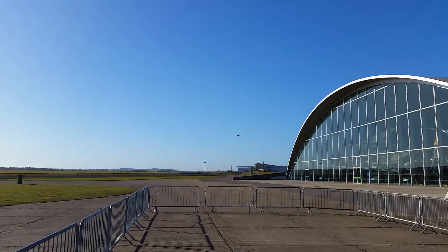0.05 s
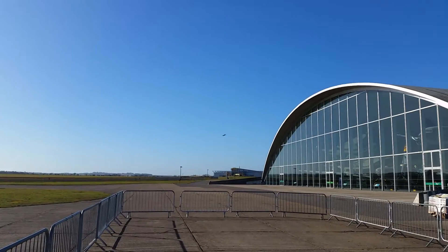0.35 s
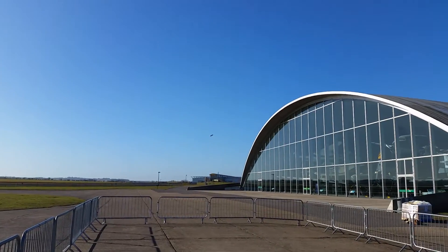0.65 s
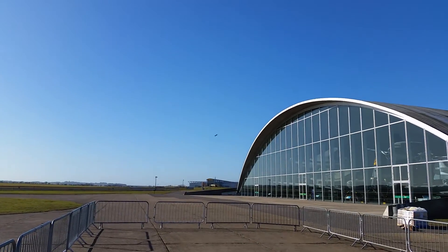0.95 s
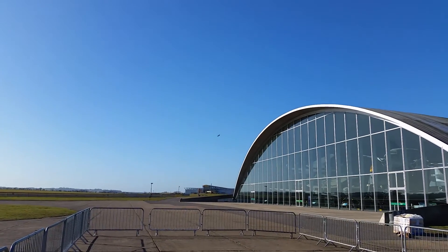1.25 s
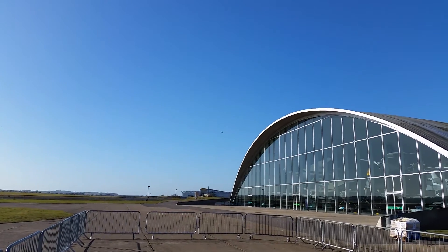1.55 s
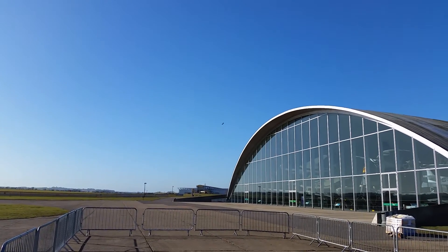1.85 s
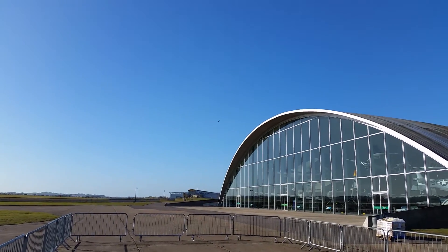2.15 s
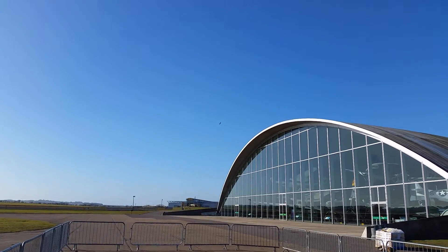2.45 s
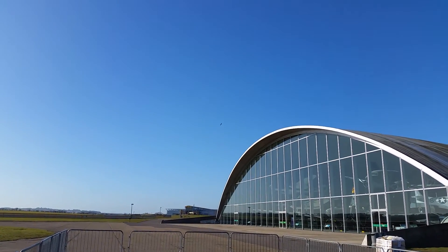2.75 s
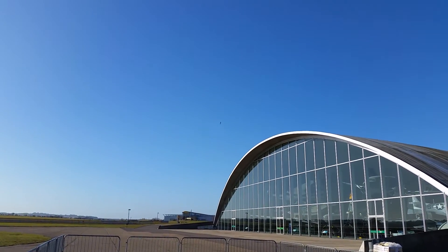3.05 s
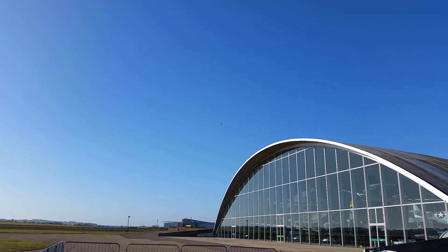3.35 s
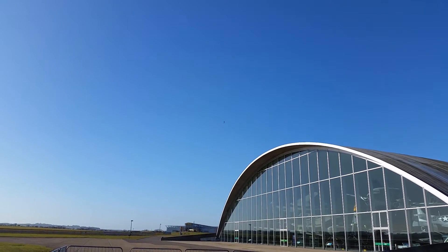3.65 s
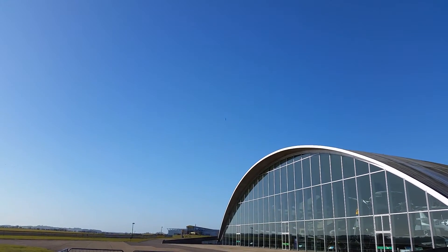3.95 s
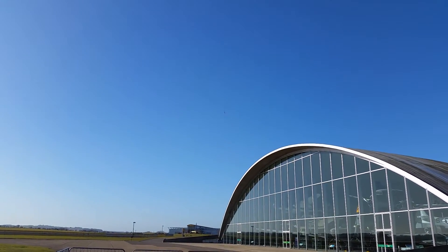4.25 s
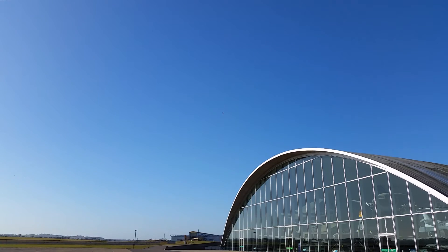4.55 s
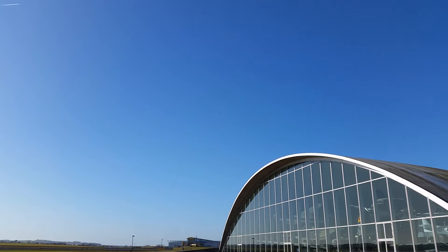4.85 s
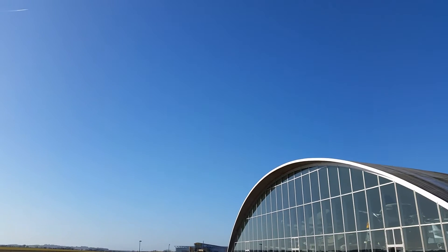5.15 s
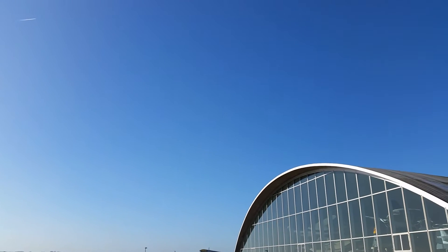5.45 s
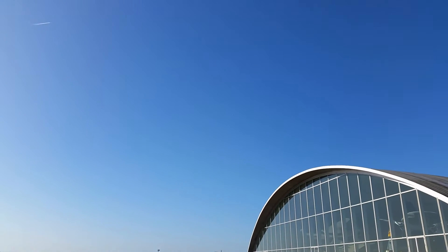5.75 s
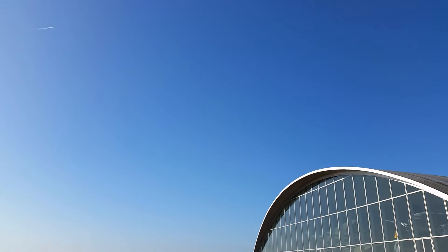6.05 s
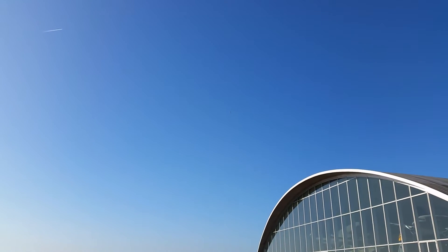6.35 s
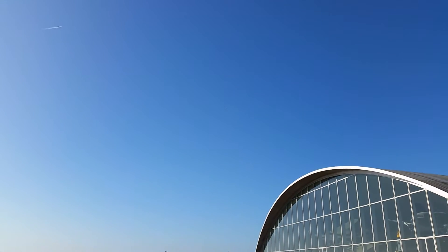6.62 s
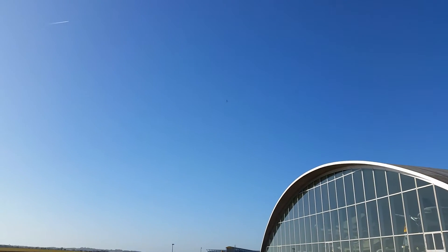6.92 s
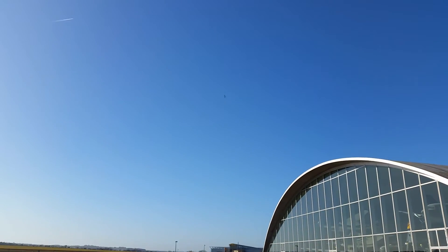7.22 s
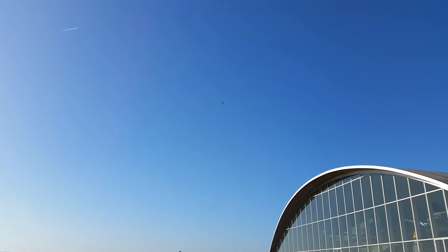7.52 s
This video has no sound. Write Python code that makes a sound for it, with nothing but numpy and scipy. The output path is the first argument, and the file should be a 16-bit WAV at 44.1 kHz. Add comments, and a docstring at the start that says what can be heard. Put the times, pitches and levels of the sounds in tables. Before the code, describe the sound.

Wind buffets the microphone as a far-off piston aircraft hums and rasps, sinks away, then returns.

```python
"""A distant propeller aircraft drones over an open airfield. It opens on the hum of its piston engine and
the rasp of its exhaust firings, swelling and fading in the moving air, over a steady ground engine and a
far rumble. A thin, wavering hiss swells after two seconds. From three seconds gusts thump the left
microphone port, while the right stays sheltered. Around five to six seconds the aircraft sinks away
under the wind; its rasp and upper hum come back just before the end."""
import sys
import numpy as np
from scipy import signal
from scipy.fft import rfft, irfft
from scipy.io import wavfile
from scipy.ndimage import uniform_filter1d, minimum_filter1d

SR = 44100
rng = np.random.default_rng(int(sys.argv[2]) if len(sys.argv) > 2 else 0)


def generate_wav(sig):
    """Save sig (samples, or channels by samples) to the path in sys.argv[1] as 16-bit PCM at SR."""
    pcm = np.round(np.clip(np.atleast_2d(sig).T, -1, 1) * 32767).astype(np.int16)
    wavfile.write(sys.argv[1], SR, pcm)


N = 338688
TIME = np.arange(N) / SR
BINS = np.maximum(np.arange(N // 2 + 1) * SR / N, 1)   # Hz
CYLINDERS = 6
AIR_EDGE_HZ = 2270   # where the top of the rasp begins, the part the moving air lifts and lowers

# The aircraft's pitch, sagging as it passes. Each row: time in seconds, four-stroke cycles per second.
ENGINE_SPEED = [(0.0, 17.55), (1.4, 17.22), (3.0, 17.2), (4.2, 17.05), (6.3, 17.22), (7.68, 17.42)]
def engine_cycles():
    """Running count of engine cycles; every cylinder fires once in each."""
    return np.cumsum(in_time(ENGINE_SPEED)[0]) / SR


# Fader for the firing tone. Each row: time in seconds, level in dB.
FIRING_LEVEL = [(0.0, -17.5), (0.2, -13.5), (0.52, -20.5), (0.74, -15), (1.2, -17.5), (1.5, -21),
                (2.95, -17.5), (3.3, -20.5), (4.25, -20), (4.7, -27), (5.0, -42.5), (7.68, -26)]
# Faders for the hum above it. Each row: time in seconds, ninth order in dB, upper orders in dB.
OVERTONE_LEVELS = [(0.0, -20.5, -19), (1.2, -24, -25), (2.3, -29, -31.5), (2.95, -21.5, -23),
                   (3.6, -32, -29), (4.2, -46, -22), (5.6, -38, -26), (7.68, -53, -17)]
# The mix of those upper orders. Each row: multiple of the cycle rate, relative level in dB.
UPPER_ORDERS = [(8, -9.5), (11, -7), (12, -1.5), (14, -9), (15, 0.5), (16, -11.5), (18, -14.5), (30, -19.5)]
def drone(cycles):
    """Clean engine orders: the firing tone, and the overtones that unequal cylinders fill in."""
    ninth_db, upper_db = in_time(OVERTONE_LEVELS)
    firing = from_db(in_time(FIRING_LEVEL)[0] + 0.5) * tone(CYLINDERS * cycles, waver=.07, rate=3.0)
    ninth = from_db(ninth_db - 1.2) * tone(9 * cycles, waver=.3, rate=4.0)
    upper = sum(from_db(db) * tone(round(k) * cycles, waver=.42, rate=3.0) for k, db in UPPER_ORDERS)
    return firing + ninth + from_db(upper_db - 6.5) * upper


# Fader for the exhaust as the moving air carries it. Each row: time in seconds, level in dB.
EXHAUST_LEVEL = [(0.0, -26.5), (0.05, -16), (0.21, -17), (0.29, -16.5), (0.38, -16), (0.45, -19),
                 (0.54, -16), (0.74, -19), (1.0, -28.5), (1.28, -21), (1.38, -29), (1.48, -25.5),
                 (1.58, -16.5), (1.66, -29), (1.73, -26), (2.12, -25.5), (2.28, -31.5), (2.38, -21),
                 (2.57, -17), (2.67, -26), (2.87, -21), (3.12, -25.5), (3.21, -23.5), (3.34, -28),
                 (3.44, -24), (3.7, -35.5), (4.04, -29), (4.16, -19.5), (4.31, -32.5), (4.66, -28),
                 (4.92, -38.5), (5.03, -27), (5.14, -32.5), (5.62, -38.5), (6.28, -38.5), (6.58, -31.5),
                 (7.19, -32), (7.46, -27), (7.57, -16.5), (7.68, -20.5)]
# The exhaust's EQ. Each row: frequency in Hz, left gain in dB, right gain in dB.
EXHAUST_COLOUR = [(393, -9.5, -9.5), (920, -12, -7.5), (1170, -9, -4), (1430, -15.5, -3.5),
                  (1950, -13.5, 0.5), (2364, -20.5, -3.5), (2790, -25, -14.5), (4300, -38, -28)]
# A moving treble shelf on the rasp. Each row: time in seconds, gain in dB.
RASP_TOP = [(0.3, -4.5), (0.65, 9.5), (0.95, -11), (3.3, -0.5), (7.68, -8.5)]
# The growl under the rasp. Each row: time in seconds, level against the rasp in dB.
GROWL_LEVEL = [(1.27, -18), (1.47, -3.5), (1.7, -19), (2.3, -4), (2.57, -12), (3.0, -4.5), (3.5, -12.5),
               (4.1, -7), (5.05, -11), (7.6, -12.5)]
# Stereo image of exhaust and hiss. Each row: frequency in Hz, phase lead of the left port in radians.
PORT_PHASE = [(1350, -.1), (1900, 1.4), (2600, 3), (9700, 7.9), (12500, 7.35)]
def exhaust(cycles, rasp_db, echo_db):
    """Firing pulses swirl in the air, meet their ground echo and reach the ports as rasp and growl."""
    pulses = firings(cycles, rise_s=.0011, crack_s=.0027, puff_s=.0032, puff_db=4.5, misfire_db=1.5)
    swirl = from_db(-8.0 + .7 * TIME) * multipath(pulses, spread_s=.011, wander_s=.0005, count=3)
    carried = scintillate(pulses + swirl, patchy_db=2.0, rate=3.0, bands=10)
    heard = ground_echo(carried, echo_db)
    scatter = from_db(-12) * rng.standard_normal((2, N))   # off the hangar front, different at each port
    colour = from_db(in_pitch(EXHAUST_COLOUR)) * left_lead(PORT_PHASE)
    ports = shaped(rms_one(heard) + scatter, colour)
    top = shaped(ports, above(AIR_EDGE_HZ, order=10) ** 2)
    ports = ports + top * (from_db(in_time(RASP_TOP)[0]) - 1)
    rasp = evened(shaped(ports, above(850) * below(3400, order=8)), 900, 2800)
    growl = evened(shaped(ports, below(700, order=6) * above(400)), 430, 850)
    growl = from_db(in_time(GROWL_LEVEL)[0]) * growl
    return from_db(in_time(EXHAUST_LEVEL)[0] + rasp_db) * (flared(rasp) + growl)


def firings(cycles, rise_s, crack_s, puff_s, puff_db, misfire_db):
    """Every firing gives its cylinder's own crack and a bright puff of noise."""
    firing = (CYLINDERS * cycles).astype(int)
    cylinder = firing % CYLINDERS
    age = np.arange(N) - np.searchsorted(firing, firing)   # samples since the last firing
    cracks = rng.standard_normal((CYLINDERS, SR // 20))
    # strong and weak firings alternate, and no two are quite alike
    strength = from_db(1.47 * (-1) ** cylinder + misfire_db * rng.standard_normal(N)[firing])
    rise = 1 - np.exp(-age / SR / rise_s)
    crack = cracks[cylinder, age] * rise * np.exp(-age / SR / crack_s)
    puff = shaped(rng.standard_normal(N) * rise * np.exp(-age / SR / puff_s), above(1130, order=1))
    return strength * (rms_one(crack) + from_db(puff_db) * rms_one(puff))


def multipath(x, spread_s, wander_s, count):
    """Paths of wandering length through turbulent air smear the pulses and make their colour swirl."""
    lags_s = [spread_s * (k - count // 2) / count + wander_s * drift(0.99) for k in range(count)]
    return sum(delayed(x, lag_s) for lag_s in lags_s)


def scintillate(x, patchy_db, rate, bands):
    """Turbulent air swells and fades each band by itself."""
    edges_hz = np.linspace(0, AIR_EDGE_HZ, bands)[1:]
    lows = [0] + [shaped(x, below(hz, order=10) ** 2) for hz in edges_hz] + [x]
    return sum((high - low) * from_db(patchy_db * drift(rate)) for low, high in zip(lows, lows[1:]))


# The echo off the apron, shifting as the aircraft manoeuvres. Each row: time in seconds, lag in seconds.
GROUND_LAG = [(0.08, .00102), (.33, .00062), (.72, .00046), (1.5, .00165), (2.45, .0016), (3.25, .00215),
              (3.55, .00165), (7.1, .0016), (7.5, .00102)]
def ground_echo(x, echo_db):
    """The reflection off the concrete carves notches that sweep as its lag changes."""
    dulled = shaped(x, below(1800, order=1))
    return x + from_db(echo_db) * delayed(dulled, in_time(GROUND_LAG)[0])


# Brief flares of the rasp. Each row: centre in seconds, half-length in seconds, pitch in Hz, gain in dB.
FLARES = [(2.18, 0.034, 1920, 7.5), (3.24, .07, 1390, 5), (4.14, 0.066, 980, 6), (5.143, 0.11, 1220, -1),
          (5.38, .035, 2260, 16.5), (5.806, 0.032, 1240, 14), (6.5, .15, 1230, 6)]
def flared(rasp, width_hz=140):
    """Now and then the air focuses one band of the rasp for a moment."""
    flares = 0
    for centre_s, width_s, hz, db in FLARES:
        band = shaped(rasp, np.exp(-.5 * ((BINS - hz) / width_hz) ** 2))
        flares = flares + band * (from_db(db) - 1) * bell(centre_s, width_s)
    return rasp + flares


# Fader for the wind on the exposed left port. Each row: time in seconds, level in dB.
WIND_LEFT = [(0.0, -15), (0.7, -26), (1.05, -14.5), (1.68, -11.5), (1.9, -23), (3.25, -12.5), (3.6, -13.5),
             (4.28, -11), (4.78, -10), (5.05, -11.5), (5.55, -7), (5.93, -16.5), (6.1, -10), (7.2, -10.5),
             (7.68, -17.5)]
# Fader for the wind on the sheltered right port. Each row: time in seconds, level in dB.
WIND_RIGHT = [(0.0, -27), (4.1, -18.5), (4.6, -21), (5.05, -26), (6.2, -27), (7.0, -45)]
# Single hard thumps on the left. Each row: centre in seconds, relative peak level in dB.
BUFFETS = [(.965, -21), (1.738, -23), (3.174, -15), (3.281, -15.5), (3.712, -16), (3.805, -14.5),
           (4.298, -13.5), (4.515, -18.5), (4.755, -14.5), (4.8, -14.5), (4.933, -12), (5.091, -18),
           (5.203, -14), (5.453, -15.5), (5.623, -15), (6.125, -20), (6.323, -15.5), (6.367, -19),
           (6.771, -15.5), (6.797, -15.5)]
def wind(left_db, buffet_db, buffet_s, flutter_db, gusts_per_s):
    """Gusts rumble on both ports; the left brightens as they strengthen and takes short buffets."""
    swing_db = flutter_db * drift(gusts_per_s)
    gust_db = in_time(WIND_LEFT)[0] + swing_db
    left = eddies(lump_db=2.4, bright_lump_db=6.8)
    bright_db = 0.4 * (gust_db - gust_db.mean()) + 2.0
    left = left + shaped(left, above(300) ** 2) * (from_db(bright_db) - 1)
    thumps = from_db(buffet_db) * bumps(BUFFETS, width_s=buffet_s)
    slap = shaped(rng.standard_normal(N), above(210, order=2) * below(405))
    slap = slap / np.sqrt(uniform_filter1d(slap ** 2, size=300) + 1e-9)   # held level so each thump lands
    right = shaped(eddies(lump_db=2.0, bright_lump_db=3.5), below(230, order=1))
    return np.array([from_db(gust_db + left_db) * left + thumps * slap,
                     from_db(in_time(WIND_RIGHT)[0] + swing_db) * right])


# The wind's bass-heavy EQ. Each row: frequency in Hz, gain in dB.
WIND_COLOUR = [(15, -12), (25, -14), (45, -3), (75, -1.5), (120, 2.5), (200, -4.5), (300, -11.5),
               (420, -19), (600, -28), (900, -45)]
def eddies(lump_db, bright_lump_db):
    """Lumpy turbulence at a port: the harder an eddy hits, the brighter it is."""
    colour = from_db(in_pitch(WIND_COLOUR)[0]) * below(960) * above(16)
    noise = rms_one(shaped(rng.standard_normal(N), colour))
    force = np.tanh(drift(21.0) / 8.9) * 1.04
    low, high = shaped(noise, below(298) ** 2), shaped(noise, above(292) ** 2)
    return rms_one(low * from_db(lump_db * force) + high * from_db(bright_lump_db * force - 2.0))


# The ground engine's chord. Each row: multiple of the shaft rate, relative level in dB.
GENERATOR_ORDERS = [(3, -25.5), (6, -32), (8, -31.5), (12, -40.5)]
# Its fader, with one dip. Each row: time in seconds, level in dB.
GENERATOR_LEVEL = [(4.6, 0), (5.55, -7), (6.1, -4.5), (7.5, 0.5)]
def generator(shaft_hz):
    """A governed engine on the ground hums at a constant speed."""
    orders = sum(from_db(db) * tone(round(k) * shaft_hz * TIME, waver=.2, rate=3.0)
                 for k, db in GENERATOR_ORDERS)
    return from_db(in_time(GENERATOR_LEVEL)[0] + 2.5) * orders


# The hiss's EQ. Each row: frequency in Hz, left gain in dB, right gain in dB.
HISS_COLOUR = [(2940, -0.5, -4), (4020, -4.5, -6.5), (4600, -34, -23), (5294, -4, -1.5), (6540, -24, -18),
               (7710, -12, -3), (8470, 6.5, -11.5), (9360, 6.5, 0.5), (10050, 10, -2.5),
               (10770, 16.5, -3.5), (12350, 4.5, -5.5), (14900, -7, -7)]
# Fader for the top of the hiss. Each row: time in seconds, level in dB.
HISS_LEVEL = [(0.0, -34.5), (1.1, -34), (1.45, -29), (1.8, -32), (2.1, -25), (2.3, -23), (2.58, -32),
              (2.85, -27.5), (3.35, -31), (3.42, -26.5), (3.65, -25.5), (4.0, -34), (4.66, -30), (4.8, -37),
              (5.2, -38), (5.68, -32.5), (5.88, -28.5), (6.85, -34.5), (7.22, -35.5), (7.29, -24.5),
              (7.42, -31), (7.68, -31.5)]
# Its pan. Each row: time in seconds, left minus right in dB.
HISS_PAN = [(0.0, -3), (2.25, 7), (4.5, 8), (5.1, 13), (6.0, 1.5)]
# The sheen on its highest edge. Each row: time in seconds, relative lift in dB.
HISS_EDGE = [(0.3, -6), (2.3, 2.5), (3.65, 4), (4.5, -3.5), (6.4, -8)]
# A faint tick in the hiss. Each row: centre in seconds, peak level in dB.
TICKS = [(3.418, -30.5)]
def hiss(top_db, shared, flicker_db, low_db, low_fade_db_per_s, low_follows):
    """Thin hiss close to the ports: a steadier lower part and a top that swells and changes its edge."""
    common = shaped(rng.standard_normal(N), left_lead(PORT_PHASE))
    noise = np.sqrt(shared) * common + np.sqrt(1 - shared) * rng.standard_normal((2, N))
    noise = shaped(noise, from_db(in_pitch(HISS_COLOUR)) * above(890))
    noise = noise / np.std(in_band(noise, 9000, 14500), axis=-1, keepdims=True)
    lower = shaped(noise, below(8220, order=10) ** 2)
    middle = shaped(noise - lower, below(11630, order=12) ** 2)
    edge = noise - lower - middle
    edge_gain = from_db(in_time(HISS_EDGE) + [[13.5], [3]])   # more sheen on the left
    top = (middle + edge_gain * edge) / np.sqrt((1 + edge_gain ** 2) / 2)
    level_db = in_time(HISS_LEVEL) + top_db + in_time(HISS_PAN) * [[.5], [-.5]]
    lower_db = low_db - low_fade_db_per_s * TIME + low_follows * (level_db - level_db.mean())
    ticks = bumps(TICKS, width_s=0.0053) * noise
    flicker = from_db(flicker_db * drift(12.0))
    return (from_db(level_db) * top + from_db(lower_db) * lower) * flicker + ticks


# The dark EQ of the airfield bed. Each row: frequency in Hz, gain in dB.
AIRFIELD_COLOUR = [(25, -16), (70, 4), (130, -3.5), (260, 0.5), (420, -10.5), (850, -19), (1250, -24),
                   (2200, -23.5), (4000, -53)]
def airfield(level_db, side_db):
    """Distant rumble, nearly alike in both ports."""
    mid, side = shaped(rng.standard_normal((2, N)), from_db(in_pitch(AIRFIELD_COLOUR)[0]) * below(4500))
    return from_db(level_db) * (rms_one(mid) + from_db(side_db) * rms_one(side) * [[1], [-1]])


def tone(turns, waver, rate):
    """A sine whose level and phase waver as its paths through the air change."""
    along, across = 1 + waver * drift(rate), waver * drift(rate)
    turns = turns + rng.random()
    phase = (2 * np.pi * (turns - np.floor(turns))).astype(np.float32)
    return (along * np.cos(phase) - across * np.sin(phase)) * np.sqrt(2 / (1 + 2 * waver ** 2))


def drift(rate):
    """Slow random motion with spread 1, changing about rate times a second."""
    hop, settle = 40, 2000
    pole = np.exp(-2 * np.pi * hop * rate / SR)
    noise = rng.standard_normal(N // hop + settle + 2)
    slow = signal.lfilter([1], [1, -2 * pole, pole * pole], noise)[settle:]
    return np.interp(np.arange(N) / hop, np.arange(len(slow)), rms_one(slow))


def bumps(rows, width_s):
    """A swell for each event, no two equally long."""
    return sum(from_db(db) * bell(s, width_s * 2 ** rng.uniform(-0.61, 0.52)) for s, db in rows)


def bell(centre_s, width_s):
    """A bell-shaped swell of height 1."""
    return np.exp(-.5 * np.minimum(((TIME - centre_s) / width_s) ** 2, 60))


def evened(x, low_hz, high_hz):
    """Ride both ports so the right holds level 1 in a band, leaving colour and fast flutter."""
    power = in_band(x[1], low_hz, high_hz) ** 2
    return x / np.sqrt(uniform_filter1d(uniform_filter1d(power, size=2600), size=2600))


def delayed(x, lag_s):
    """The sound heard after a lag that may change with time."""
    return np.interp(TIME - lag_s, TIME, x, left=0)


def left_lead(rows):
    """Stereo filter that turns the left channel's phase ahead of the right's."""
    return np.exp(1j * in_pitch(rows) * [[1], [0]])


def shaped(x, gain):
    """Filter by a gain per frequency bin."""
    return irfft((rfft(x.astype(np.float32)) * gain).astype(np.complex64), N)


def in_band(x, low_hz, high_hz):
    """Hard-edged band-pass."""
    return shaped(x, (BINS > low_hz) & (BINS < high_hz))


def below(hz, order=4):
    """Gain of a smooth low-pass."""
    return 1 / np.sqrt(1 + (BINS / hz) ** (2 * order))


def above(hz, order=4):
    """Gain of the matching high-pass."""
    return np.sqrt(1 - below(hz, order=order) ** 2)


def in_time(rows):
    """Each column of a curve at every sample."""
    seconds, *columns = np.transpose(rows)
    return np.array([np.interp(TIME, seconds, column) for column in columns])


def in_pitch(rows):
    """Each column of a spectrum at every frequency bin."""
    hz, *columns = np.transpose(rows)
    return np.array([np.interp(np.log(BINS), np.log(hz), column) for column in columns])


def from_db(db):
    """Decibels to gain."""
    return 10 ** (np.asarray(db) / 20)


def rms_one(x):
    """Scale to unit rms."""
    return x / np.sqrt(np.mean(x ** 2) + 1e-20)


def scene():
    """Aircraft and ground sounds arrive from ahead; wind and hiss arise at the ports."""
    cycles = engine_cycles()
    hum = (drone(cycles) + generator(shaft_hz=24.86)) * from_db([[.7], [0]])
    rasp = exhaust(cycles, rasp_db=-0.5, echo_db=-9.5)
    gusts = wind(left_db=-2.5, buffet_db=1.5, buffet_s=0.006, flutter_db=2.07, gusts_per_s=0.97)
    air = hiss(top_db=-1.2, shared=.64, flicker_db=1.6,
               low_db=-30, low_fade_db_per_s=0.84, low_follows=0.37)
    return hum + rasp + gusts + air + airfield(level_db=-29.0, side_db=-9.0)


def record(dry):
    """A fast limiter holds the highest peaks; the top is cut."""
    cutoff_hz, slope_hz = 14650, 150
    gain = minimum_filter1d(1 / np.maximum(np.abs(dry), 1), size=401, axis=-1)
    limited = dry * uniform_filter1d(gain, size=401, axis=-1)
    return .97 * shaped(limited, np.clip((cutoff_hz - BINS) / slope_hz + .5, 0, 1))


dry = scene()
out = record(dry)
generate_wav(out)
```